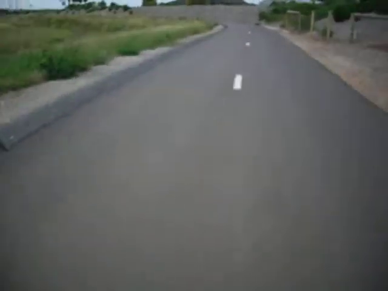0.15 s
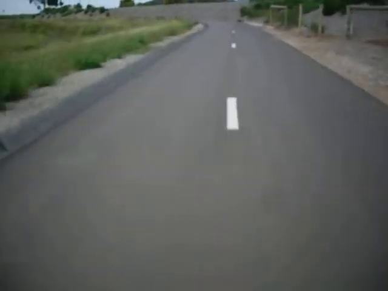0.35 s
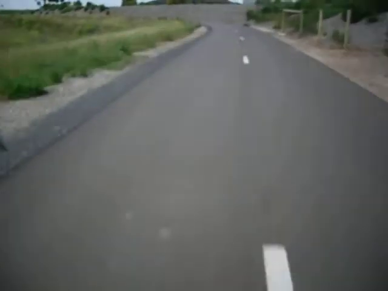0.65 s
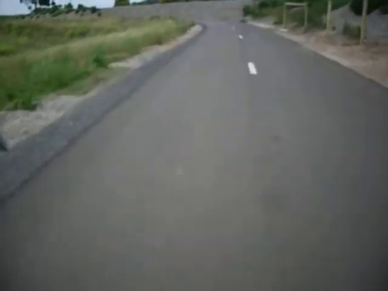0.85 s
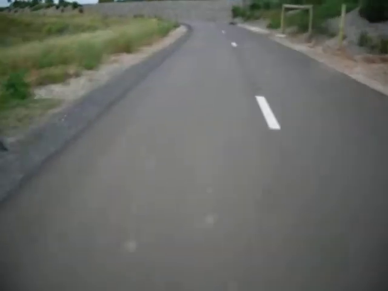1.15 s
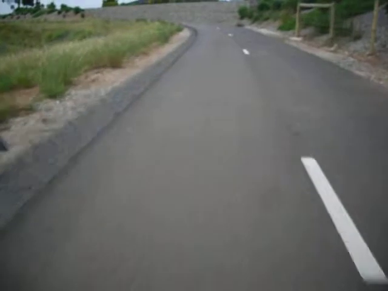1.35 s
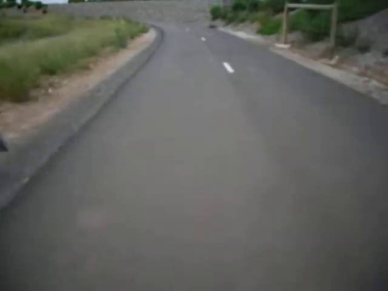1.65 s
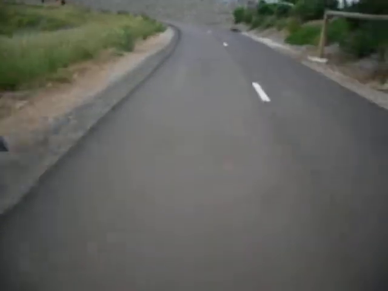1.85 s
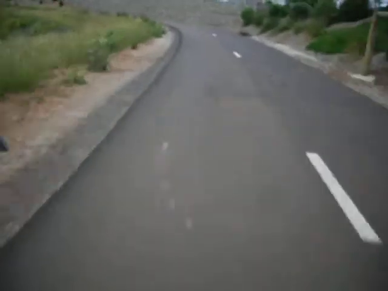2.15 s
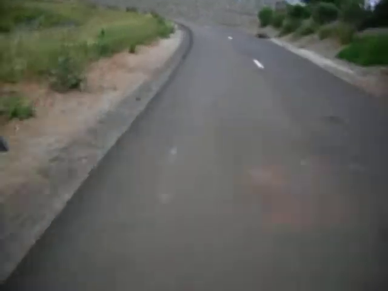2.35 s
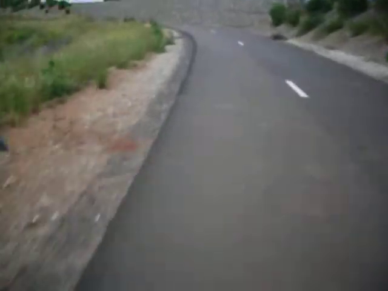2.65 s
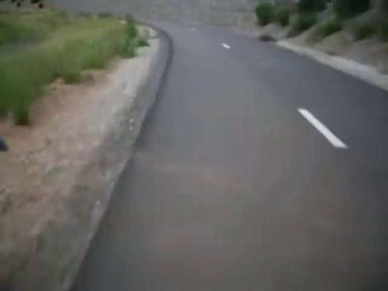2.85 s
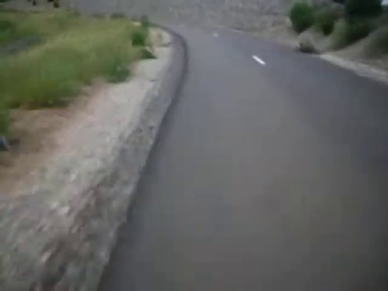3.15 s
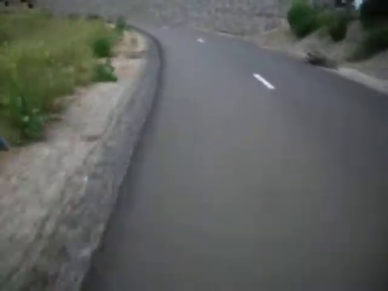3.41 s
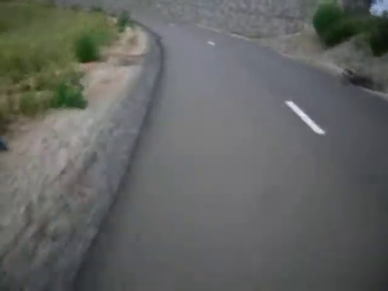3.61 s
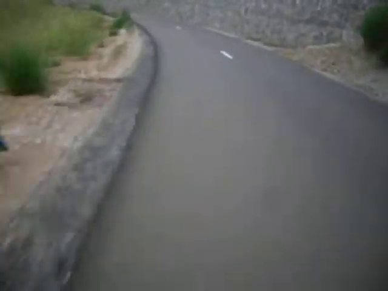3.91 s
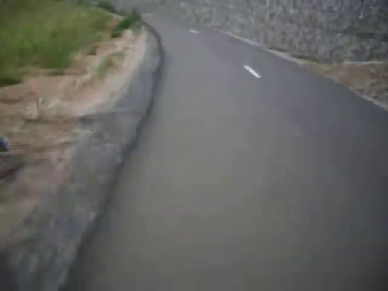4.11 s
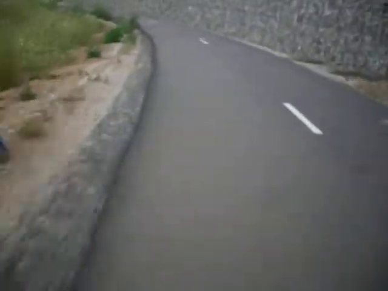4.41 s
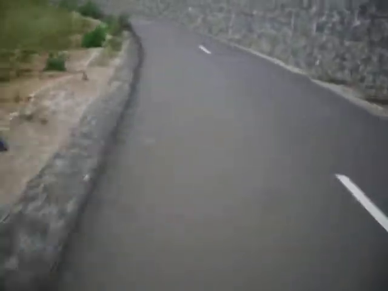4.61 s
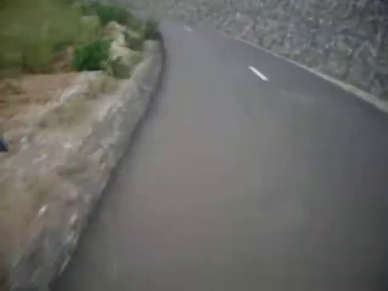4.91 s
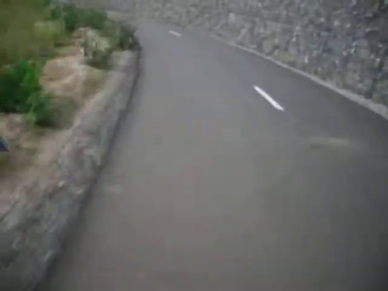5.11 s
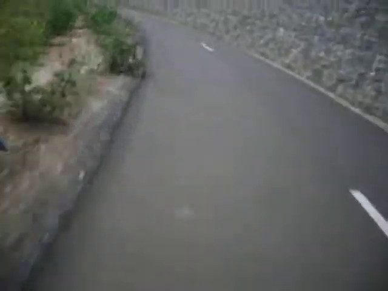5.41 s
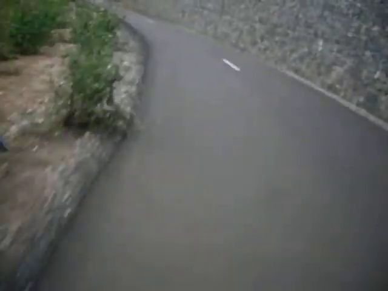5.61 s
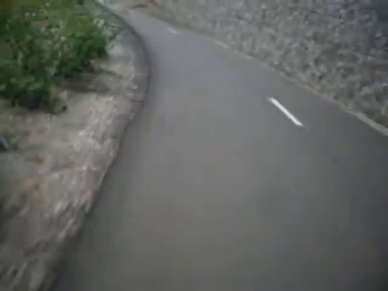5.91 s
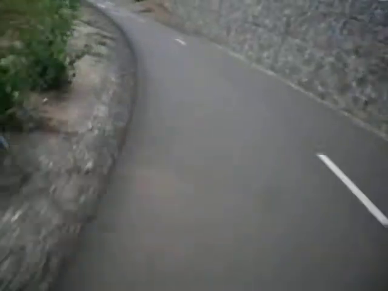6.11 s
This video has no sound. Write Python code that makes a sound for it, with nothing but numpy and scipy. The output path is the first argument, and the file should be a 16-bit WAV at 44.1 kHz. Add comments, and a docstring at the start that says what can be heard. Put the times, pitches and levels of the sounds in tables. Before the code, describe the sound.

A bicycle rolls fast on a paved path for about six and a half seconds, heard close from a microphone fixed to it. Tyre vibration makes a continuous hollow drone, joined by a fluttering rush of wind and deep buffeting, with a gust right at the start. Small stones tick lightly throughout. Irregular bumps knock the bike and make a loose housing rattle and clink: several in the first second, a strong cluster around 1.7 seconds, more at 2.5 and 3.5, the sharpest rattle near 5.2, and a further run from 5.6 to the end. Soft dips add very short booms at about 1.5, 3.6 and 4.9 seconds. The tyre drone swells slightly at the very end. The whole sound is dull and a little hissy, and the hardest hits overload slightly.

```python
"""On a paved path, a bicycle rolls fast with a small camera fixed to it.
Tyre vibration drones through the frame and the camera mount. Bumps make them knock and set the
loose housing clinking and rattling, soft dips boom, and small stones tick underneath.
Wind buffets the microphone, and the hardest hits overload the camera's dull, hissy sound channel."""
import sys
import numpy as np
from scipy import signal
from scipy.fft import rfft, irfft, next_fast_len
from scipy.io import wavfile
from scipy.ndimage import uniform_filter1d, map_coordinates

SR = 44100
rng = np.random.default_rng(int(sys.argv[2]) if len(sys.argv) > 2 else 0)


def persist_wave(psi):
    """Save psi, clipped to +-1, as 16-bit WAV."""
    counts = np.round(np.clip(psi, -1, 1) * 32767).astype(np.int16)
    wavfile.write(sys.argv[1], SR, np.atleast_2d(counts).T)


N = 276066

# Asphalt roughness. Each row: time in seconds, mount drone level in dB, frame shudder level in dB.
ROUGHNESS = [(0.0, -14, -19), (0.42, -13, -21), (0.78, -13.5, -21), (1.36, -14, -22), (1.69, -15.5, -19.5),
             (1.93, -12.5, -22.5), (2.28, -14, -24), (2.7, -13, -21), (3.35, -14.5, -24),
             (3.59, -13.5, -21), (3.85, -13.5, -22), (3.94, -12.5, -23), (4.46, -16.5, -24),
             (4.62, -15, -24.5), (5.72, -14, -19), (6.05, -13, -23), (6.14, -18, -20.5), (6.26, -8.5, -21)]
# The frame's low body and the mount's hollow ring.
# Each row: pitch in Hz, bandwidth in Hz, relative level in dB.
FRAME_MODES = [(159, 48, -3), (191.5, 82, -2), (260, 71, -4)]
MOUNT_MODES = [(362.8, 38, -5.5), (403.5, 76, -0.5), (469.6, 69, -1.5), (564.3, 89, -6.5), (728, 450, -21)]


def tyres(jiggle_db, rock, patches_per_s=26):
    """The rolling tyres shake the frame and make the mount drone, swelling over bumps and rough patches."""
    drone_db, shudder_db = curves(ROUGHNESS)
    drone_db = drone_db + jiggle_db + 2 * rock + 0.78 * wobble(patches_per_s)
    shudder_db = shudder_db + 3.5 * rock + 1.5 * wobble(patches_per_s)
    drone = amp(drone_db) * shaken(MOUNT_MODES, evenness=0.62, wander_db=1.95)
    shudder = amp(shudder_db) * shaken(FRAME_MODES, evenness=0.46, wander_db=2.0)
    return drone + shudder


# Hits from the path. Each row: start in seconds, then rattle, clink and knock, each in relative dB.
BUMP_HITS = [(0.0504, -7.5, -35, -9), (0.2982, -15.5, -44, -12), (0.389, -5.5, -23.5, -23),
             (0.4966, -6, -35, -9), (0.5447, -16, -48, -17), (0.7388, -5, -27, -12),
             (0.7575, -8, -28.5, -15), (0.991, -13, -48, -16), (1.4354, -13, -40.5, -26),
             (1.7219, -11, -39, -19), (1.736, -2, -19.5, -7.5), (1.7592, -3.5, -27, -12),
             (1.8448, -5, -37, -11), (2.2186, -12.5, -48, -20), (2.522, -3.5, -21.5, -8.5),
             (2.5449, -12, -35, -16), (2.6154, -10.5, -41, -15), (2.8972, -9, -49, -13),
             (2.9157, -11, -42, -21), (2.985, -12, -39, -26), (3.4618, -14, -40.5, -11.5),
             (3.4924, -3.5, -34, -14), (3.7031, -13, -53, -18), (4.2702, -8.5, -36, -13.5),
             (4.7227, -12.5, -41.5, -22), (5.1883, -0.5, -23, -24), (5.2076, -2.5, -26, -17),
             (5.2216, -10, -40, -11), (5.3234, -12.5, -53, -10), (5.3712, -7.5, -44, -19),
             (5.5936, -6.5, -43, -14), (5.6201, -15, -39, -25), (5.784, -5, -37, -12),
             (6.0029, -11, -29.5, -16), (6.0228, -14, -42, -18), (6.104, -10.5, -50, -14),
             (6.135, -4.5, -40, -10.5), (6.2292, -9, -38, -19)]
# The housing's boxy rattle and bright clink. Each row: frequency in Hz, relative level in dB.
RATTLE_TONE = [(150, 2.5), (600, 10.5), (1000, 0), (1400, 3), (1950, -14), (2700, -6.5), (3300, -18.5),
               (4000, -36), (6000, -37)]
CLINK_TONE = [(1500, -18), (2600, 10.5), (3300, 4), (3950, -6), (4900, -0.5), (6000, -7)]


def bumps(knock_lead_s=0.002, rattle_t60_s=0.061, rebound_s=0.0069, chatter_db=2.3):
    """Each bump knocks frame and mount; then the loose housing clinks, rebounds once and chatters."""
    t = np.arange(SR // 4) / SR
    knocks, rattle_env, clink_env = np.zeros((3, N + SR))
    contact = lambda age: attack(age, 0.0011) * np.exp(-age / 0.0022)
    double_contact = contact(t) + amp(-4) * contact(np.maximum(t - rebound_s, 0))
    for s, rattle_db, clink_db, knock_db in BUMP_HITS:
        start, knock_start = round(s * SR), round((s - knock_lead_s) * SR)
        rattle_env[start:][:len(t)] += attack(t, 0.0015) * amp(rattle_db - 60 * t / rattle_t60_s)
        clink_env[start:][:len(t)] += amp(clink_db) * double_contact
        ring = amp(12) * struck(FRAME_MODES, t) + amp(12.5) * struck(MOUNT_MODES, t)
        knocks[knock_start:][:len(t)] += amp(knock_db) * ring * attack(t, 0.0014)
    chatter = unit(amp(chatter_db * wobble(350)))
    rattle = amp(2) * rattle_env[:N] * coloured(RATTLE_TONE)
    clink = amp(15.5) * clink_env[:N] * coloured(CLINK_TONE)
    return knocks[:N] + chatter * (rattle + clink)


def rocking(rise_s=0.01, settle_s=0.022, limit_db=-6):
    """How much the bicycle rocks, 0-1: hard or closely spaced bumps rock it most, up to a limit."""
    t = np.arange(N) / SR
    push = 0
    for s, db, *_ in BUMP_HITS:
        log_envelope = np.minimum((t - s) / rise_s, (s - t) / settle_s)
        push = push + amp(db) * np.exp(np.maximum(log_envelope, -20))
    return np.tanh(push / amp(limit_db))


# Gusts at the microphone. Each row: time in seconds, buffet level in dB.
GUSTS = [(0.0, -20), (0.12, -39), (0.57, -27), (1.04, -28.5), (1.18, -29.5), (1.74, -28.5), (2.14, -30),
         (2.46, -25.5), (2.6, -31), (2.88, -27.5), (3.54, -26.5), (3.77, -29), (4.36, -32), (5.13, -27),
         (5.47, -27.5), (5.68, -26), (5.82, -25), (6.26, -32)]
# The deep buffet and the airy rush. Each row: frequency in Hz, relative level in dB.
BUFFET_TONE = [(10, -30), (22, -21), (38, -11), (52, 3), (75, -3.5), (115, -12.5), (250, -17.5),
               (600, -73.5)]
RUSH_TONE = [(150, -0.5), (500, 5.5), (800, 3), (980, -6), (1250, -2.5), (1600, -17), (1900, -16.5),
             (2200, -16), (2450, -21.5), (2700, -12.5), (3150, -28.5), (3750, -44), (4800, -36),
             (6000, -49)]


def wind(jiggle_db, rock, eddy_db=2.5, gust_share=0.074):
    """Low eddies hit the microphone port under a headwind that flutters as the bicycle jiggles."""
    gust_db, = curves(GUSTS)
    buffet = amp(gust_db + 3 * rock + eddy_db * wobble(7)) * coloured(BUFFET_TONE)
    flutter_db = jiggle_db + 1.1 * wobble(140)
    rush_db = -23.5 + gust_share * (gust_db - gust_db.mean()) + flutter_db
    return buffet + amp(rush_db) * coloured(RUSH_TONE)


# Soft dips in the path. Each row: crest in seconds, pitch in Hz, peak in dB, half length in seconds.
DIP_BOOMS = [(1.443, 670, -10.5, 0.0039), (1.545, 200, -9.5, 0.018), (3.555, 159, -13.5, 0.02),
             (4.901, 220, -9.5, 0.01)]


def dips():
    """A soft dip swells one resonance of frame or mount into a short boom and lets it go."""
    t = np.arange(N) / SR
    return sum(amp(db) * np.exp(-((t - s) / half) ** 2) * np.sin(2 * np.pi * hz * (t - s))
               for s, hz, db, half in DIP_BOOMS)


# The housing's dull tick. Each row: frequency in Hz, relative level in dB.
TICK_TONE = [(300, -17), (700, 5.5), (1000, -6.5), (1400, -5), (1950, -14.5), (2700, -13.5), (3300, -18.5),
             (4000, -41), (6000, -45)]


def grit(count=170, spread_db=1.74, tick_fade_s=0.0037):
    """Small stones under the tyres: each jogs the mount and makes the housing tick."""
    t = np.arange(SR // 12) / SR
    stones = np.zeros(N)
    when, size_draw = rng.random((count, 2)).T
    stones[(when * (N - 1)).astype(int)] = amp(-spread_db * np.log(np.maximum(size_draw, .05)))
    ticks = signal.fftconvolve(stones, np.exp(-t / tick_fade_s))[:N] * coloured(TICK_TONE)
    jogs = signal.fftconvolve(stones, struck(MOUNT_MODES, t))[:N]
    return amp(-25.5) * ticks + amp(-22.5) * jogs


def shaken(modes, evenness, wander_db):
    """Resonances driven by the asphalt, each swelling on its own; evenness 0-1 steadies their sum."""
    x = 0
    for centre, width, db in modes:
        resonance = lambda hz: 1 / (1 + ((hz * hz - centre ** 2) / (hz * width + 1e-9)) ** 2)
        ring = filtered(rng.standard_normal(N), resonance)
        x = x + amp(db + wander_db * wobble(12)) * ring
    slow_power = np.abs(uniform_filter1d(unit(x) ** 2, size=2600)) + 1e-6
    return unit(x / slow_power ** (evenness / 2))


def struck(modes, t):
    """One blow on the resonances, each at a new strength; wide ones die first."""
    strengths = amp(rng.normal(0, 0.56, len(modes)))
    return sum(gain * amp(db) * np.exp(-np.pi * width * t) * np.sin(2 * np.pi * hz * t)
               for gain, (hz, width, db) in zip(strengths, modes))


def attack(t, rise_s):
    """An onset that eases from 0 up to 1."""
    return 1 - np.exp(-t / rise_s)


def amp(db):
    """Decibels to gain."""
    return 10 ** (np.asarray(db) / 20)


def unit(x):
    """x at rms 1."""
    return x / np.sqrt(np.mean(x ** 2) + 1e-20)


def curves(rows):
    """One value per sample for each column after the time."""
    times, *columns = np.transpose(rows)
    return [np.interp(np.arange(N) / SR, times, column) for column in columns]


def wobble(rate):
    """A smooth random curve, rate knots a second."""
    return map_coordinates(rng.standard_normal(int(N * rate / SR) + 4), [np.arange(N) * rate / SR])


def gain_along(spectrum, hz):
    """Gain of (Hz, dB) points joined on a log axis."""
    points_hz, db = np.transpose(spectrum)
    return amp(np.interp(np.log(hz + 1), np.log(points_hz), db))


def filtered(x, response):
    """x through an EQ whose gain is response(hz)."""
    size = next_fast_len(N + 8192)
    return irfft(rfft(x, size) * response(np.fft.rfftfreq(size, 1 / SR)), size)[:N]


def coloured(spectrum):
    """Noise of rms 1 with the given spectrum."""
    return unit(filtered(rng.standard_normal(N), lambda hz: gain_along(spectrum, hz)))


def scene():
    """Everything reaches one microphone on the bicycle, which jiggles over the uneven asphalt."""
    jiggle_db, rock = 1.28 * wobble(55), rocking()
    return (tyres(jiggle_db, rock) + wind(jiggle_db, rock) + bumps() + dips() + grit())[None]


# The colour of the camera's sound channel. Each row: frequency in Hz, gain in dB.
CHANNEL_EQ = [(2, -25), (12, 9), (45, 0), (1900, 1), (2400, 1), (2700, -0.5), (3300, 0.5), (3900, -2),
              (4800, 2.5), (5500, 1)]


def record(dry, ceiling=0.65, hardness=5, band_hz=5370, hiss_top_hz=15750):
    """The input overloads and keeps only a narrow band; the camera's hiss swells with each wave."""
    x = dry[0] * amp(0.08)
    clipped = x / (1 + np.abs(x / ceiling) ** hardness) ** (1 / hardness)
    dull = filtered(clipped, lambda hz: gain_along(CHANNEL_EQ, hz) / np.sqrt(1 + (hz / band_hz) ** 40))
    hiss = amp(-37.5) * (np.abs(dull) + 0.0025) * rng.standard_normal(N)
    return filtered(dull + hiss, lambda hz: hz < hiss_top_hz)[None]


dry = scene()
out = record(dry)
persist_wave(out)
```